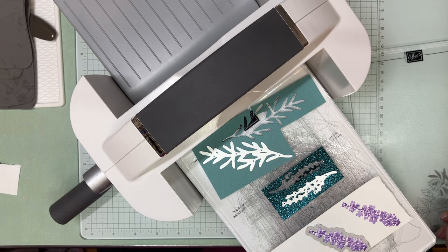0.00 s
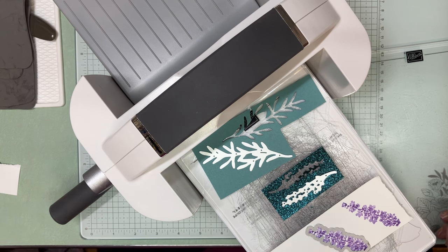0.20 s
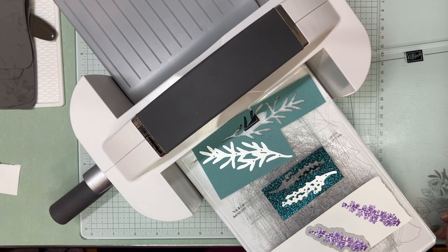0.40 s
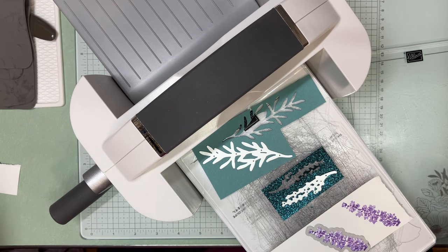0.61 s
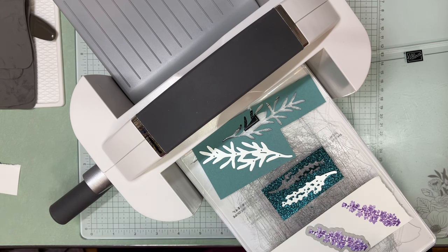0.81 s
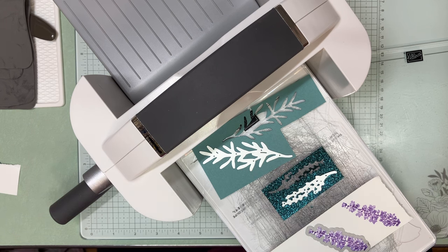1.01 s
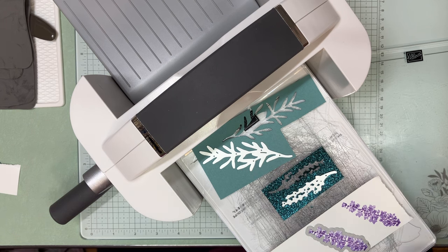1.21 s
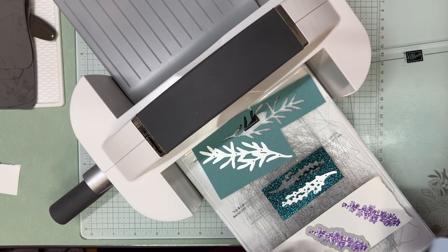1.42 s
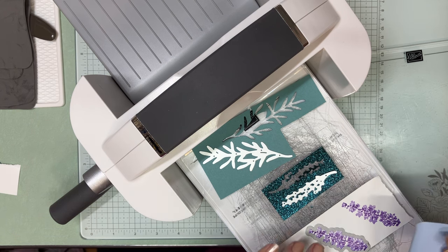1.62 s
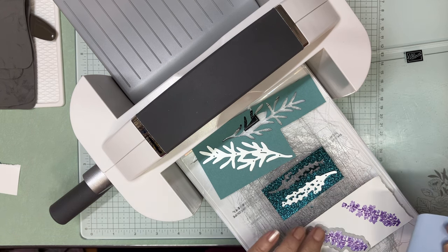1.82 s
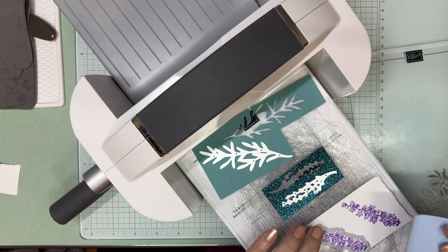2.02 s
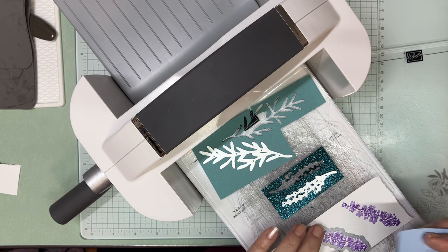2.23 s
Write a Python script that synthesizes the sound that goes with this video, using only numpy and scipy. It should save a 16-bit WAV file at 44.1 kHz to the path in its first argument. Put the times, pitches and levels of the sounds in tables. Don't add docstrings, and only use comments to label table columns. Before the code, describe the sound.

Crisp paper peeling in two quick bursts, soft hand thumps on the table, a loud snap as the note is pressed down, faint rubbing, and one last small tick; quiet indoor room with low hum, near microphone.

```python
import sys
import numpy as np
from scipy import signal
from scipy.fft import rfft, irfft
from scipy.io import wavfile
from scipy.ndimage import uniform_filter1d

SR = 44100
rng = np.random.default_rng(int(sys.argv[2]) if len(sys.argv) > 2 else 0)


def boost_factor(decibels):
    exponent = np.asarray(decibels, float) / 20
    return 10 ** exponent


def dump_mix(stems):
    frames = np.atleast_2d(stems).T
    limited = np.clip(frames, -1, 1)
    pcm = np.round(limited * 32767).astype(np.int16)
    wavfile.write(sys.argv[1], SR, pcm)


N = 101430


def evened(x):
    return x / np.sqrt(np.mean(x ** 2) + 1e-20)


def read_curve(points, hz):
    point_hz, value = np.transpose(points)
    return np.interp(np.log(hz + 1), np.log(point_hz + 1), value)


def colour(x, spectrum):
    log_gain = np.log(boost_factor(read_curve(spectrum, abs(np.fft.fftfreq(4096, 1 / SR)))))
    minimum_phase = np.exp(log_gain - 1j * signal.hilbert(log_gain).imag)
    taps = np.fft.ifft(minimum_phase).real[:2048]
    return signal.oaconvolve(x, taps / np.linalg.norm(taps))[:N]


def sheet_resonance(x, hz, q):
    carrier = np.exp(2j * np.pi * np.cumsum(hz) / SR)
    shifted_down = x / carrier
    out = np.zeros(N)
    for centre_hz in np.geomspace(250, 8000, 6):
        octaves_off = abs(np.log2(np.clip(hz, 250, 8000) / centre_hz))
        share = np.clip(1 - octaves_off, 0, 1)
        r = np.exp(-np.pi * centre_hz / q / SR)
        smoothed = signal.lfilter([(1 - r) ** 2], [1, -2 * r, r * r], shifted_down)
        out += share * (carrier * smoothed).real * np.sqrt(8 / (1 - r))
    return out


def grains(per_s, spread_db):
    size = boost_factor(spread_db * np.minimum(rng.exponential(1, N), 3.5))
    sign = rng.choice([-1., 1.], N)
    return evened(size * sign * (rng.random(N) < per_s / SR))


# pitch_hz, likeness (0 to 1)
PORT_LIKENESS = [(60, .98), (300, .88), (1000, .7), (2500, .35), (5000, .15), (6800, .95), (8500, .999),
                 (16000, .999)]


def half_alike(left, other, hz):
    same = np.clip(read_curve(PORT_LIKENESS, hz), 0, 1)[:, None]
    return np.array([left, same * left + np.sqrt(1 - same ** 2) * other])


# pitch_hz, level_db (per Hz)
AIR_HISS = [(20, -42), (40, -24), (65, -0.5), (158, -18), (1100, -38), (2100, -36), (8000, -45),
            (16000, -48.5)]
HISS_DB = -65
HUM_HZ, HUM_WIDTH_HZ, HUM_DB = 67, 9.2, -69.5


def room_tone():
    frames, hz = N // 512 + 5, np.fft.rfftfreq(2048, 1 / SR)
    a, b, c, d = rng.standard_normal((frames, 1025, 4)).T
    noise = half_alike(a + 1j * b, c + 1j * d, hz)

    def shaped(gain):
        return evened(signal.istft(noise * gain[:, None], nperseg=2048, noverlap=1536)[1][:, :N])

    hiss = shaped(boost_factor(read_curve(AIR_HISS, hz)))
    hum = shaped(1 / (1 + ((hz - HUM_HZ) / HUM_WIDTH_HZ) ** 4))
    return boost_factor(HISS_DB) * hiss + boost_factor(HUM_DB) * hum * boost_factor([[.6], [-.6]])


# pitch_hz, t60_s
TAIL_DECAY = [(200, 0.14), (2000, 0.23), (8000, 0.12), (16000, 0.05)]
TAIL_DB = -12


def room_tail(x):
    length = SR // 2
    taps = np.zeros((2, length))
    at = np.arange(40, length - 20, 20)
    at = at + rng.integers(0, 20, (2, len(at)))
    np.put_along_axis(taps, at, rng.choice([-1., 1.], at.shape), 1)
    hz, t, z = signal.stft(taps, SR, nperseg=256)
    decay = boost_factor(-60 * t / read_curve(TAIL_DECAY, hz)[:, None])
    tail = signal.istft(half_alike(z[0], z[1], hz) * decay, SR, nperseg=256)[1][:, :length]
    tail = boost_factor(TAIL_DB) * tail / np.linalg.norm(tail[0])
    return signal.fftconvolve(x[None], tail, axes=1)[:, :N]


SCATTER_S, MOVE_S = .0012, .04


def camera_scatter(x):
    t, other = np.arange(N) / SR, np.zeros(N)
    same = np.clip(read_curve(PORT_LIKENESS, np.fft.rfftfreq(N, 1 / SR)), 0, 1)
    for at in np.arange(0, t[-1] + MOVE_S, MOVE_S):
        scatter = rng.standard_normal(400) * np.exp(-t[:400] / SCATTER_S)
        window = np.cos(np.pi / 2 * np.clip((t - at) / MOVE_S, -1, 1))
        other += signal.oaconvolve(x * window, scatter / np.linalg.norm(scatter))[:N]
    shared = rfft(x) * np.sqrt((1 + same) / 2)
    differing = rfft(other) * np.sqrt((1 - same) / 2)
    return irfft(shared + np.array([[1], [-1]]) * differing, N)


# start_s, level_db, pitch_hz, t60_s
THUMPS = [(.11, -51, 283, 0.086), (0.302, -44.5, 74.5, 0.11), (0.309, -58, 145, 0.11),
          (0.505, -44.5, 265, 0.27), (0.536, -42, 143.6, 0.32), (0.547, -42, 63.5, 0.27),
          (0.598, -38, 81.2, 0.075), (.635, -46.5, 59, 0.12), (1.044, -53, 82, 0.26),
          (1.046, -31, 458, 0.025), (1.064, -38, 422, 0.084), (1.127, -48.5, 520, 0.052),
          (1.54, -71.5, 66.1, .15), (1.81, -48.5, 65.8, 0.22)]
THUMP_RISE_TURNS = 0.37


def table_thumps():
    t, out = np.arange(N) / SR, np.zeros(N)
    for start_s, level_db, hz, t60_s in THUMPS:
        u = np.maximum(t - start_s, 0)
        rise = np.minimum(u * hz / THUMP_RISE_TURNS, 1)
        out += rise * boost_factor(level_db - 60 * u / t60_s) * np.sin(2 * np.pi * hz * u)
    return out


# start_s, length_s, pitch_hz, level_db
TAUT_PATCHES = [(0, 0.075, 1223, -67), (.112, .04, 800, -60.5), (.2, .03, 920, -61),
                (.245, .07, 331, -50.5), (.265, .03, 4030, -41), (.243, .02, 7300, -43.5),
                (.4, .09, 870, -71), (.43, .045, 6700, -51.5), (.445, .03, 3510, -48),
                (.51, .06, 1720, -43), (.53, .05, 990, -49), (0.587, 0.092, 295, -55.5),
                (.53, .05, 770, -39), (.532, .018, 3300, -40), (0.728, 0.059, 397, -61),
                (.728, .04, 743, -56), (.728, .03, 2510, -48.5), (1.04, .02, 2320, -47.5),
                (1.063, .025, 2670, -44), (1.0623, .012, 4370, -36), (1.063, .03, 1400, -44.5),
                (1.162, 0.016, 3540, -52), (1.164, .018, 7600, -46), (2.015, .01, 2100, -70),
                (1.39, .15, 2000, -68.5), (1.4, .14, 6950, -66), (1.48, .1, 1440, -74),
                (1.62, .07, 2030, -80.5), (1.79, .08, 2000, -80.5), (2.0455, .009, 2215, -42),
                (2.047, .008, 4400, -42), (2.045, .008, 7040, -41), (2.17, .13, 1576, -86.5)]
PATCH_Q = 8


def taut_patches():
    out = np.zeros(N)
    all_clicks = rng.laplace(size=(len(TAUT_PATCHES), 9000)) ** 3
    for (start_s, length_s, hz, level_db), clicks in zip(TAUT_PATCHES, all_clicks):
        u = np.arange(0, min(length_s, .2), 1 / SR) / length_s
        b, a = signal.iirpeak(hz, PATCH_Q, SR)
        ringing = signal.lfilter(b, a, signal.lfilter(b, a, clicks))
        tone = evened(ringing[-len(u):]) * np.sin(np.pi * u ** .45)
        part = out[max(round(start_s * SR), 0):][:len(u)]
        part += boost_factor(level_db) * tone[:len(part)]
    return out


# start_s, peak_db, t60_s, body_db, body_pitch_hz
SNAPS = [(0.116, -37, 0.06, -8.5, 850), (0.195, -48.5, 0.11, -10, 950), (0.233, -36.5, 0.045, 6, 2560),
         (0.2445, -34, .03, -3, 3300), (0.266, -30, 0.018, 10, 3640), (0.274, -29, 0.047, -2, 3600),
         (.288, -22, 0.067, -5.5, 460), (0.459, -39.5, 0.03, -17, 3680), (0.5058, -15, 0.04, -15.5, 1900),
         (0.5322, -18, 0.06, 0, 2300), (0.555, -29, 0.086, -10, 1000), (.5985, -31, 0.035, 6, 3900),
         (.71, -55.5, 0.032, 15, 7300), (0.73, -35, 0.068, 3.5, 1400), (0.792, -47, 0.027, 8, 7900),
         (0.883, -61.5, 0.048, 17.5, 393), (0.948, -39.5, 0.12, -2, 1310), (1.041, -25, 0.027, 3, 2280),
         (1.0625, -13, 0.024, -8, 1390), (1.12, -28.5, 0.024, -10, 1530), (1.15, -41.5, .04, -5, 7000),
         (1.162, -35.5, 0.058, -21, 3700), (1.166, -31, 0.032, -11, 3700), (1.268, -56, .05, -3, 2000),
         (1.43, -63, 0.035, -10, 2020), (1.626, -61.5, 0.087, -11.5, 2000), (1.796, -63, 0.038, -1, 2010),
         (2.017, -58, 0.034, 2, 7000), (2.0465, -25, 0.03, 1.5, 5300)]
# start_s, level_db
FIRST_CRACKS = [(0.115, -14.5), (0.2433, -18), (0.2673, -19), (0.2729, -9), (0.2877, -7), (0.5082, -14.5),
                (0.535, -6), (0.5415, -8), (.7315, -15.5), (0.952, -26), (1.0409, -1.5), (1.0629, 3),
                (1.0636, 3), (1.066, -13), (1.0745, -18.5), (.5992, -9), (.6025, -11), (2.048, -10),
                (1.796, -40.5)]
# pitch_hz, level_db (per Hz)
CRACK_COLOUR = [(200, -29.5), (700, -9.5), (2100, 2.5), (3300, 5), (4800, 0.5), (7200, -6.5), (11500, -2),
                (16000, -42.5)]
SNAP_DB, SNAP_RISE_S, SNAP_GRAIN_DB, SNAP_Q = -8, .0014, 3.5, 1.5
BODY_SPREAD_DB = 1


def snaps():
    t = np.arange(N) / SR
    crisp, body, hz = np.zeros(N), np.zeros(N), np.full(N, 800.)
    for start_s, peak_db, t60_s, body_db, body_hz in SNAPS:
        u = np.maximum(t - start_s, 0)
        rise = np.minimum(u / SNAP_RISE_S, 1)
        shape = rise * boost_factor(peak_db + SNAP_DB - 60 * u / max(t60_s, .005))
        crisp += shape
        body += shape * boost_factor(body_db)
        hz[t >= start_s] = body_hz
    burst = crisp * grains(16000, SNAP_GRAIN_DB)
    for start_s, level_db in FIRST_CRACKS:
        burst[round(start_s * SR)] -= boost_factor(level_db - 11.5)
    knock = sheet_resonance(body * grains(13000, BODY_SPREAD_DB), hz, SNAP_Q)
    return colour(burst, CRACK_COLOUR), knock


# start_s, effort_db, body_db, body_pitch_hz
PEELS = [
    [(.13, -61, -12, 500), (.19, -65.5, -9, 1020), (.225, -55, 3, 1100), (.24, -39.5, -15, 830),
     (.28, -36.5, -6, 566), (.31, -46, 1.5, 540), (.37, -63, -33.5, 620)],
    [(.499, -58.5, 0.5, 1810), (.515, -37, 3, 1508), (.545, -35.5, 6, 1396), (.565, -39.5, 4, 970),
     (.58, -47, 4, 830), (.62, -48.5, -7, 650), (.68, -54, -33, 382)],
    [(.951, -49.5, -10, 500), (1.03, -50, -24.5, 400), (1.047, -42, 2.5, 556), (1.08, -44, -17.5, 1040),
     (1.12, -43.5, -19.5, 1170), (1.155, -50, -21, 496), (1.2, -56, -23, 1400)],
    [(2.01, -79, -12.5, 2090), (2.035, -70.5, -1, 2100), (2.048, -41, -4.5, 2260), (2.065, -57, -31, 2170),
     (2.1, -62.5, -10.5, 1500), (2.16, -87, 4.5, 1160), (2.3, -85.5, 4.5, 1020)],
]
# start_s, effort_db, body_db, body_pitch_hz
SLIDES = [
    [(0.0, -48.5, -12.5, 314), (0.036, -61, -2, 310), (0.09, -91, 0, 325), (0.1, -67, 5, 333)],
    [(0.37, -53, -42, 333), (0.408, -51.5, -48, 343), (0.424, -51.5, -34, 330), (0.458, -48, -29, 419),
     (0.48, -54, -9, 348), (0.498, -53.5, -7, 335)],
    [(0.68, -50.5, -50, 305), (0.718, -53, -13, 382), (0.802, -62.5, -9.5, 398), (0.832, -65, -38, 345),
     (0.91, -73.5, -16, 362), (0.94, -60, -11, 367)],
]
# start_s, effort_db, body_db, body_pitch_hz
SMOOTHING = [(1.2, -55, -11, 1620), (1.318, -54.5, -14, 1700), (1.364, -58.5, -8.5, 1660),
             (1.388, -68.5, -5.5, 1790), (1.428, -62.5, -1.5, 1820), (1.56, -69.5, -2, 1450),
             (1.59, -89.5, 3, 1550), (1.664, -72, -18, 1995), (1.75, -107, -11, 1796)]
# pitch_hz, level_db (per Hz)
RUB_COLOUR = [(150, -27.5), (300, 1), (800, -33), (2000, -5.5), (3800, 2), (7000, -4.5), (10000, -3.5),
              (16000, -7.5)]
GRAINS_PER_S, GRAIN_SPREAD_DB, CLUMP_DB, BODY_Q = 8300, 4, 2.5, 0.7


def rubbing():
    t = np.arange(N) / SR
    level, body, hz = np.zeros(N), np.zeros(N), np.full(N, 800.)
    for stroke in PEELS + SLIDES + [SMOOTHING]:
        s, effort_db, body_db, body_hz = np.transpose(stroke)
        on = (t >= s[0]) & (t < s[-1])
        level[on] = boost_factor(np.interp(t[on], s, effort_db))
        body[on] = level[on] * boost_factor(np.interp(t[on], s, body_db))
        hz[on] = np.interp(t[on], s, body_hz)
    clumps = boost_factor(CLUMP_DB * evened(uniform_filter1d(rng.standard_normal(N), size=150)))
    fibre_clicks = evened(clumps * grains(GRAINS_PER_S, GRAIN_SPREAD_DB))
    body_clicks = evened(clumps * grains(GRAINS_PER_S, BODY_SPREAD_DB))
    return colour(level * fibre_clicks, RUB_COLOUR), sheet_resonance(body * body_clicks, hz, BODY_Q)


# pitch_hz, width_hz, level_db
MAT_ECHO = [(2000, 500, -1.5), (3300, 450, -7), (4400, 970, -0.5), (5630, 440, -1), (7000, 390, 3.5)]


def off_the_mat(fibres):
    hz = np.fft.rfftfreq(N, 1 / SR)
    gain_db = sum(db * np.exp(-((hz - centre_hz) / width_hz) ** 2) for centre_hz, width_hz, db in MAT_ECHO)
    return irfft(rfft(fibres) * boost_factor(gain_db), N)


# pitch_hz, level_db (left over right)
LEFT_LEAN = [(200, 0.5), (700, 0.5), (1400, 3), (2800, 3), (5000, 1)]


def scene():
    fibres, bend = rubbing()
    crack, knock = snaps()
    paper = off_the_mat(fibres) + crack + bend + knock + taut_patches()
    lean = boost_factor(np.array([[.5], [-.5]]) * read_curve(LEFT_LEAN, np.fft.rfftfreq(N, 1 / SR)))
    at_ports = irfft(rfft(camera_scatter(paper) + room_tail(paper)) * lean, N)
    return at_ports + table_thumps() + room_tone()


def low_pass(x):
    return signal.sosfilt(signal.butter(12, 16990, fs=SR, output="sos"), x)


# pitch_hz, left_lead_radians
PORT_PHASE = [(0, 0), (900, 0), (2700, -1.6), (4500, -2.6), (7000, -2 * np.pi), (9250, -3 * np.pi),
              (13600, -5 * np.pi), (17000, -6.5 * np.pi)]
EDGE_HZ = 16250


def record(dry):
    hz = np.fft.rfftfreq(N, 1 / SR)
    left_turn = np.exp(1j * np.interp(hz, *np.transpose(PORT_PHASE)))
    band = np.clip((EDGE_HZ - hz) / 500, 0, 1)
    mix = irfft(rfft(dry) * band * np.array([left_turn, np.ones_like(left_turn)]), N)
    return low_pass(mix)


dry = scene()
out = record(dry)
dump_mix(out)
```